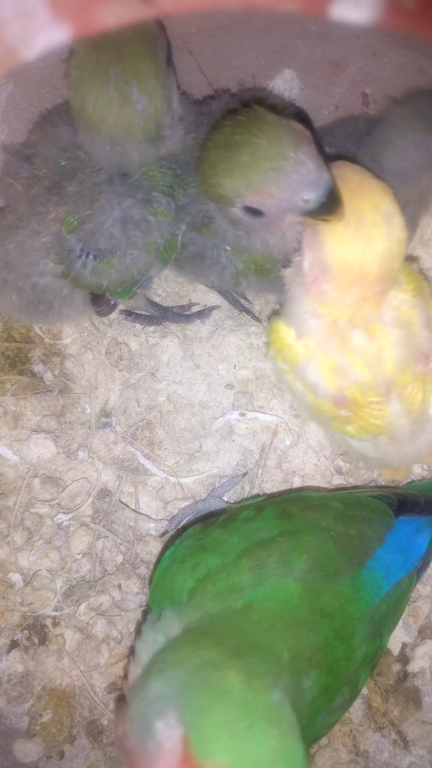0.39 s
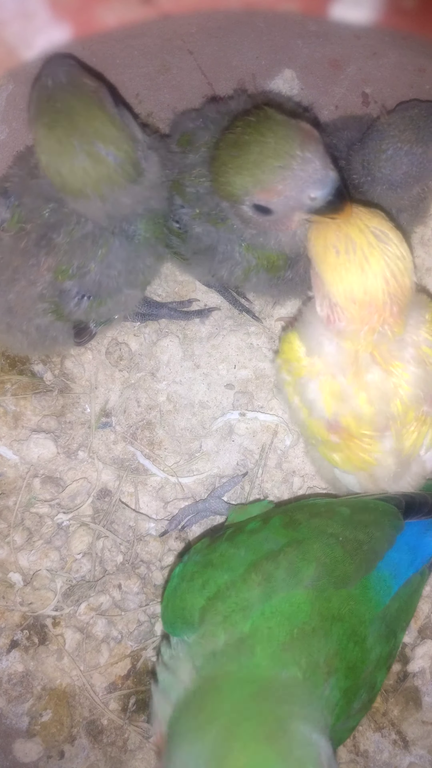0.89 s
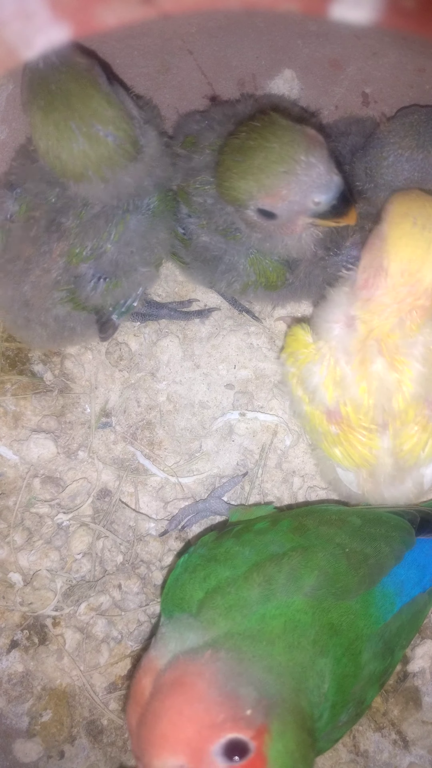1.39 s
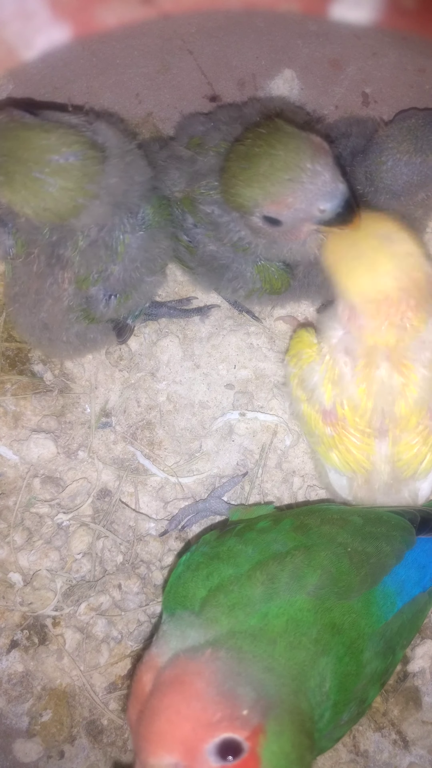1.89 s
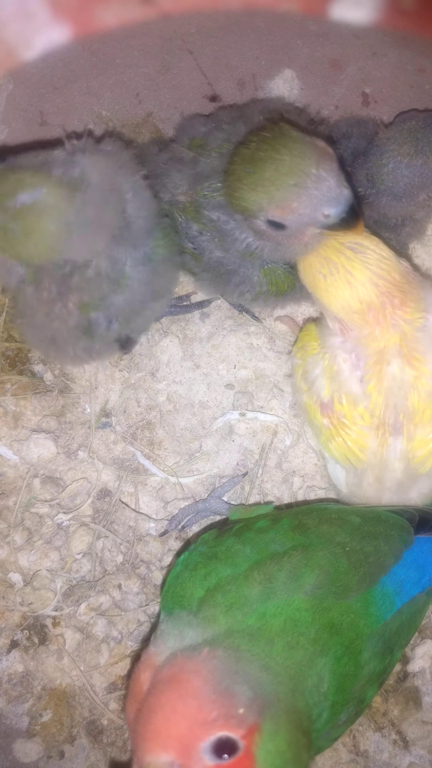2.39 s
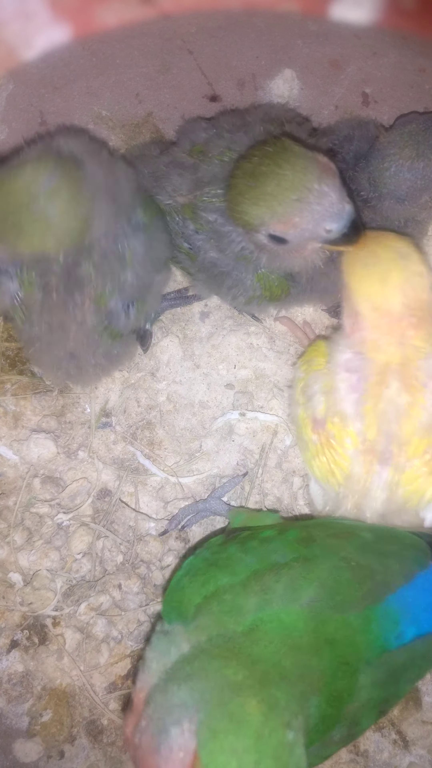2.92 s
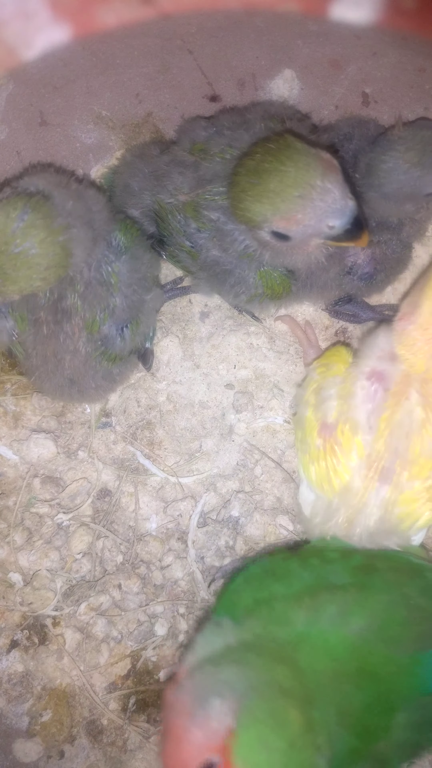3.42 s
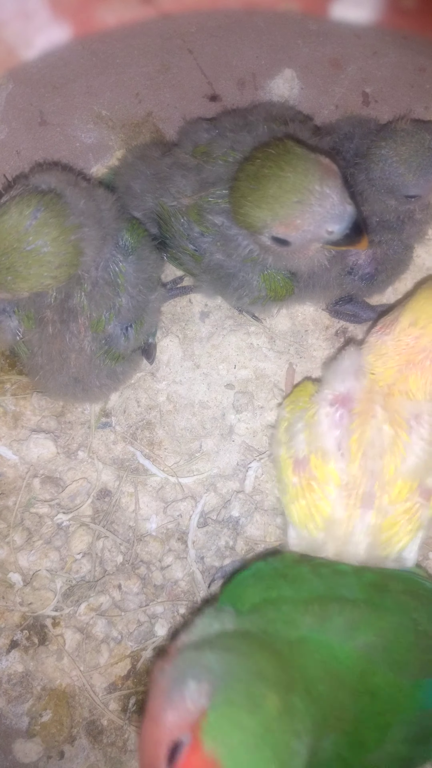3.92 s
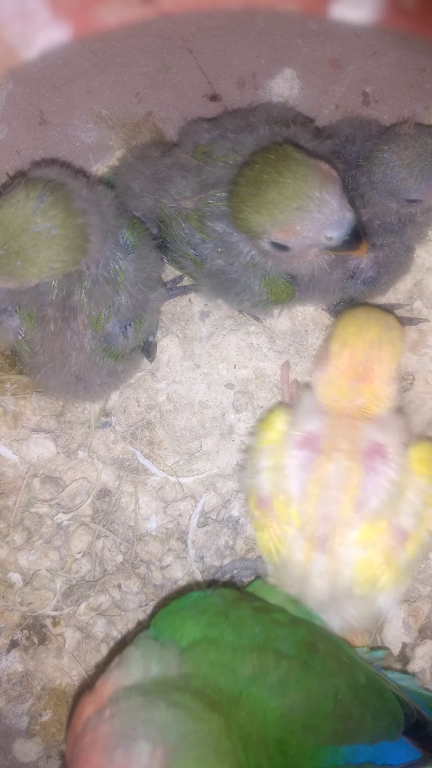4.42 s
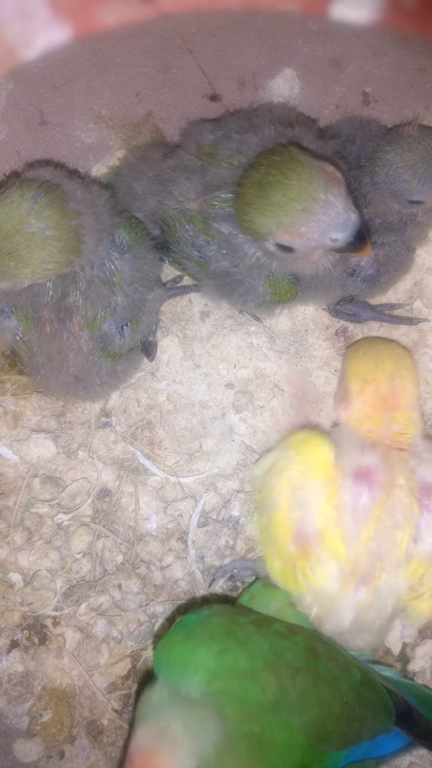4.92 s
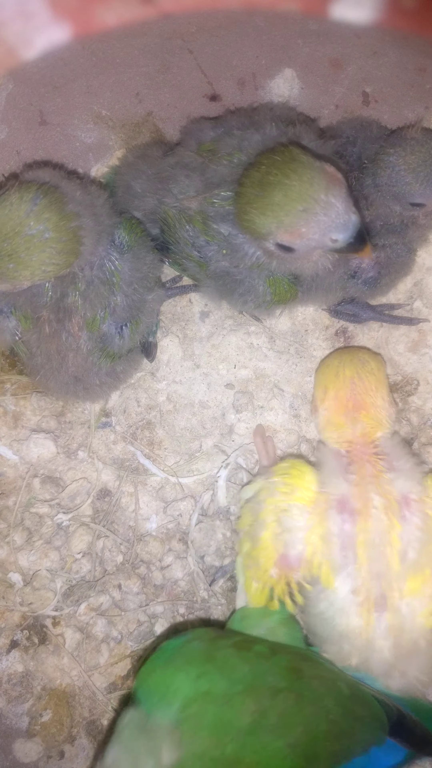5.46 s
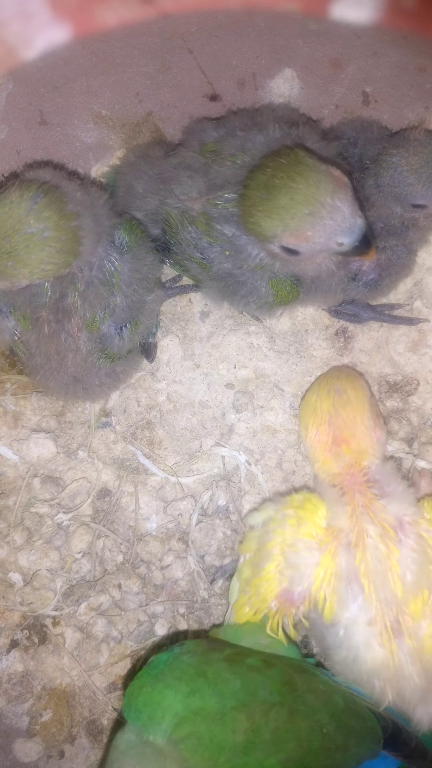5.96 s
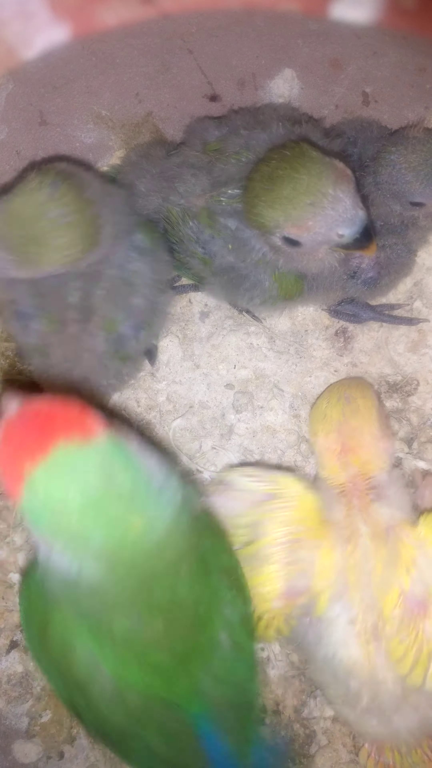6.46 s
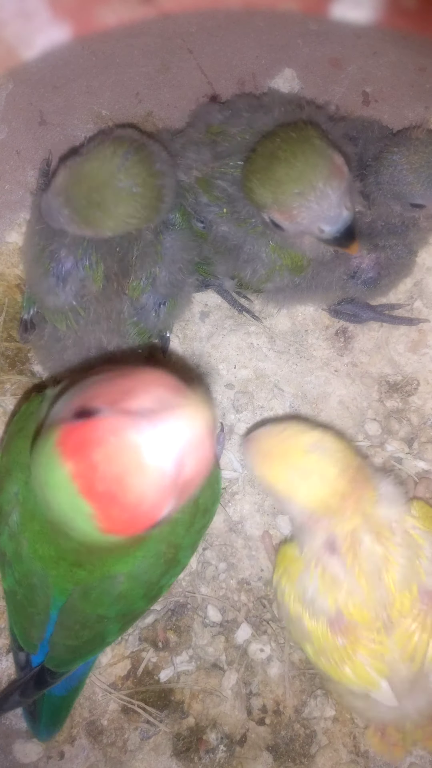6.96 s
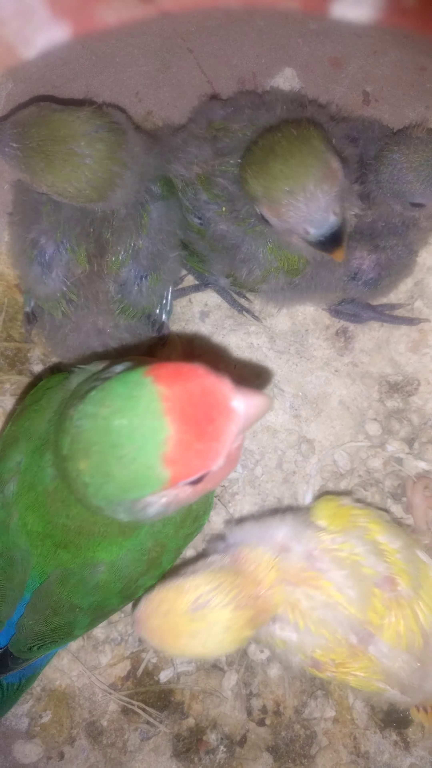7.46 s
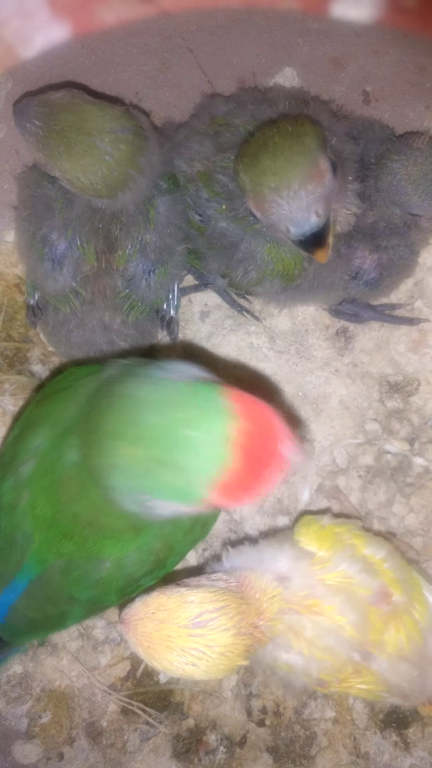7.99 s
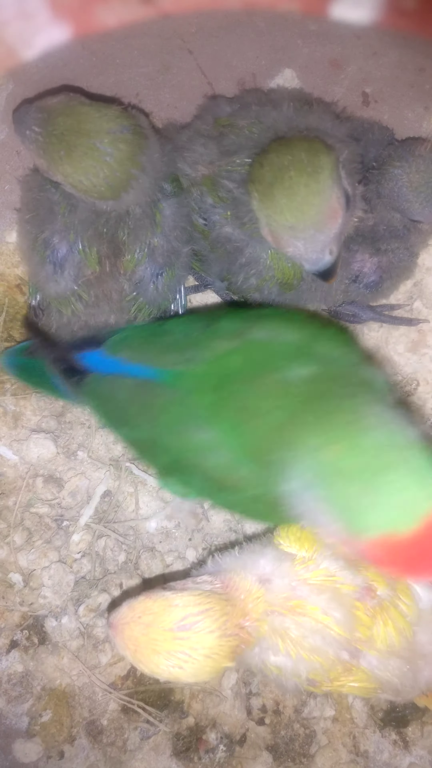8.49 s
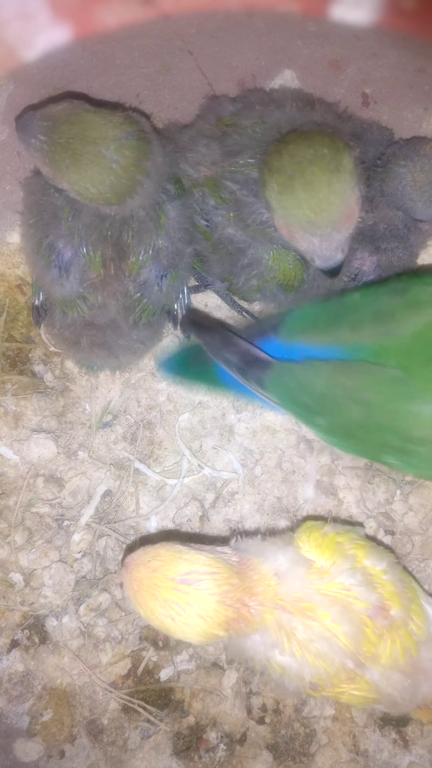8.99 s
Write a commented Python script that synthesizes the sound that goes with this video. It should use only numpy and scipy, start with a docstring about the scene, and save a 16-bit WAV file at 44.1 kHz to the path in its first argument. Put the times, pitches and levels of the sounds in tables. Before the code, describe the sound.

Two sharp squawks, a pause, rapid loud parrot chatter very near, then separate cracking squawks, scratching feet and one faint chick call over low hum.

```python
"""A low hum of the house and one faint far tone, then a squawk close by: small parrots in a nest box.
The near bird squawks, pips and chatters in one long burst; another pips far left, a chick calls near the end.
Each note is a stack of partials from the syrinx; strong breath buffets the two microphone ports and shakes
the pitch. Feet tick and scratch in the litter as filtered noise; box and room ring on as decaying noise tails."""
import sys
import numpy as np
from scipy import signal
from scipy.fft import rfft, irfft, next_fast_len
from scipy.io import wavfile
from scipy.ndimage import uniform_filter1d, minimum_filter1d

SR = 44100
rng = np.random.default_rng(int(sys.argv[2]) if len(sys.argv) > 2 else 0)


def wav_out(sig):
    """Save sig, one row per channel (or a flat mono array), as 16-bit PCM at SR to the path in sys.argv[1]."""
    wavfile.write(sys.argv[1], SR, np.round(np.clip(np.atleast_2d(sig).T, -1, 1) * 32767).astype(np.int16))


def nominal_scale(level):
    """Amplitude ratio for a level in decibels (scalar or array-like)."""
    x = np.asarray(level, float) / 20
    return 10 ** x


N = 402191
T = np.arange(N) / SR

# All levels are those ahead of the limiter in record(); a pan is left minus right.
# Steady house background, relative spectrum: [f/Hz, density/dB]
HOUSE = [(15, -57), (25, -27), (47, -8), (97, 0), (130, -5.5), (170, -2), (195, -6.5), (270, -6),
         (317, -29.5), (545, -24), (1790, -25), (2110, -26), (6050, -41), (16000, -51.5)]
# Slow swell of that background: [t/s, gain/dB]
HUM_SWELL = [(0, 2), (2.8, 0.5), (5.5, 2), (9.12, 2)]
# Dull knock in the house, relative spectrum: [f/Hz, density/dB]
KNOCK = [(300, -30), (600, -2), (900, 0), (1400, -3), (2500, -38)]
# Faint far-off tones: [start t/s, end t/s, first f/Hz, last f/Hz, level/dB]
FAR_TONES = [(0, 0.177, 2820, 2900, -47.5), (.92, 1.082, 489, 484, -52), (1.248, 1.5, 2160, 2136, -60.5),
             (1.681, 1.92, 2070, 2065, -61), (1.867, 2.019, 4280, 5700, -62),
             (1.98, 2.104, 5600, 4420, -62), (2.36, 2.602, 2150, 2100, -61),
             (6.42, 6.704, 1730, 1686, -60.5), (7.451, 7.719, 1780, 1774, -58),
             (8.08, 8.45, 1746, 1705, -58)]
# Feet and beaks in the litter: [t/s, starting level/dB, pan/dB]
TICKS = [(0.9867, -53, -2), (1.3004, -50, -4), (2.39, -44, 2), (4.449, -35, 12), (4.4894, -52, -2),
         (4.9544, -28.5, 24), (5.1729, -33.5, 23), (5.348, -37.5, 16), (5.5415, -31, 3), (5.5987, -38, 12),
         (5.709, -45, 1), (6.307, -40, 19), (6.35, -44, 13), (6.3906, -25, 18), (6.4093, -27, 16),
         (6.4366, -21, 26), (6.6283, -52.5, 4), (6.6988, -40, 15), (6.737, -40.5, 14), (6.772, -41.5, 11),
         (6.8753, -48, 5), (8.8149, -34.5, 24)]
# Bouts of scratching in the litter: [loudest t/s, level/dB, swell/(dB per s), fade/(dB per s)]
BOUTS = [(5.5, -59, 17, 30), (6.375, -36.5, 214, 223), (6.65, -58.5, 10.5, 90), (7.05, -57.5, 130, 89)]
# Sound of disturbed litter, relative spectrum: [f/Hz, density/dB]
LITTER = [(710, -45.5), (1200, -12), (1680, -5.5), (3830, -7.5), (6800, -14), (12900, -8), (16000, -10)]
# One arched begging call of a chick: [t/s, f/Hz, level/dB]
CHICK = [(8.858, 1500, -48), (8.875, 1998, -32), (8.9, 2330, -28), (8.926, 2474, -27), (8.97, 2156, -32),
         (9.018, 1800, -35)]
# Pips of a bird far to the left:
# [start t/s, length t/s, first f/Hz, last f/Hz, level/dB, first over second partial level/dB]
NEIGHBOUR = [(.652, 0.0071, 2676, 2800, -17.5, 7.2), (.681, .017, 2637, 2394, -22.5, 1),
             (.6975, 0.023, 1601, 1570, -21, 6.7)]
# Short pips that open the near bird's chatter:
# [start t/s, length t/s, first f/Hz, last f/Hz, level/dB, first over second partial level/dB]
PIPS = [(2.901, 0.02, 2873, 2957, -13, -31.5), (2.918, .012, 2742, 1707, -11.5, -9.5),
        (2.982, 0.0061, 2619, 2673, -12.5, -29.5), (3.024, .007, 2167, 2845, -13.5, -9.5),
        (3.059, .009, 2117, 2262, -12.5, -29.5), (3.105, 0.0059, 2265, 2242, -12.5, -10),
        (3.127, 0.007, 2255, 2257, -7.5, -28), (3.138, .013, 2241, 3101, -15, -25.5),
        (3.181, .01, 1906, 2295, -15.5, -12), (3.202, .032, 2301, 2653, -14, -28.5)]
# Chatter notes sweeping up from a low onset:
# [start t/s, sweep t/s, first f/Hz, level/dB, upper partials level/dB]
CHATTER = [(3.282, .011, 1738, -14.5, -8), (3.386, .01, 1915, -14.5, -5.5), (3.505, .012, 1764, -15, -5.5),
           (3.613, .012, 1965, -15, -3.5), (3.722, .011, 1723, -14, -9), (3.829, .011, 2086, -14.5, -6.5),
           (3.932, .017, 1946, -14.5, -8.5), (4.064, .017, 1875, -14, -8.5),
           (4.187, .014, 1668, -14, -13.5), (4.3, .017, 1768, -14.5, -8)]
# The whistle each sweep jumps to: [length t/s, first f/Hz, crest f/Hz, last f/Hz, breath level/dB]
WHISTLES = [(.037, 4460, 4940, 4810, -17.5), (.04, 4460, 4890, 4590, -16.5),
            (.041, 4510, 4900, 4490, -17.5), (.041, 4480, 4940, 4770, -19), (.048, 4110, 4900, 5190, -19.5),
            (.044, 4360, 5150, 4960, -16.5), (0.046, 4200, 5200, 5310, -17),
            (.043, 4360, 4500, 5020, -18.5), (.042, 3910, 4890, 5040, -18.5),
            (.043, 4160, 4890, 4850, -21.5)]
# Squawks climb fast, then creep upwards until the voice breaks: [start t/s, time to the break t/s,
# first f/Hz, climb time constant t/s, aim f/Hz, creep/(Hz per s), breath level/dB]
SQUAWKS = [(.162, .055, 2186, .004, 2617, 5977, -23.5), (.293, 0.039, 1688, .004, 2614, 504, -21),
           (5.392, 0.052, 1887, .006, 2638, 509, -16.5), (6.043, .073, 1733, .022, 2654, 3480, -25),
           (7.755, .082, 1894, .012, 2492, 5023, -30.5), (8.526, 0.068, 1927, .004, 2349, 8540, -26),
           (9.025, 0.072, 1846, .006, 2565, 3110, -22)]
# The shriek after each break, carried by the second partial:
# [length t/s, first f/Hz, last f/Hz, level/dB, breath level/dB]
SHRIEKS = [(.023, 3520, 3440, -12, -21), (0.023, 3480, 3370, -13, -21), (.025, 3450, 3300, -17, -21),
           (.028, 3500, 2850, -9.5, -15), (.034, 3450, 2730, -10, -14.5), (.04, 3087, 2780, -13.5, -21.5),
           (.019, 3510, 3190, -7.5, -12)]
# The near bird turns its head: [t/s, pan/dB]
HEAD = [(.16, -4), (.3, -3), (2.9, 1), (3.06, 4), (3.2, -1), (3.5, 0), (3.9, -0.5), (4.3, 0), (5.4, 0.5),
        (6.05, 2), (7.76, -0.5), (8.53, 1), (9.03, 5.5)]
# Timbre of each caller: [upper partials level/dB, rasp level/dB, room level/dB, pitch wobble/share]
SQUAWK_TONE = (-5, -14.5, -13, .008)
PIP_TONE = (-8, -10.5, -15.5, .012)
NEIGHBOUR_TONE = (-7, -15, -28, .006)
CHICK_TONE = (-31, -11, -11, .02)
# Chatter timbre; upper partials are set note by note: [rasp level/dB, room level/dB, pitch wobble/share]
CHATTER_TONE = (-13, -9.5, .012)
# Shaping of the upper partials by the beak: [f/Hz, gain/dB]
BEAK = [(1500, -1), (5000, 8), (7000, 5), (8600, -2.5), (10500, 1.5), (13500, -0.5), (16000, -7.5)]
# Hoarse air in the voice, relative spectrum: [f/Hz, density/dB]
HOARSE = [(700, -29), (2000, -11), (3300, -5.5), (5500, -1.5), (6900, -15), (8200, -10.5), (11000, 6),
          (14000, 1.5), (16000, -20.5)]
# Breath blowing on the microphone, relative spectrum: [f/Hz, density/dB]
BUFFET = [(25, -21), (60, 1), (250, -3.5), (600, -13.5), (1200, -19.5), (3000, -40)]

HOUSE_DB = -44  # rms of each part of the background, before its swell
KNOCK_S, KNOCK_DB, KNOCK_T60_S = 2.122, -41.5, 0.1
LEFT_LAG = 9  # samples
TOP_HZ = 15900  # no partial is sounded above this, and the finished sound is cut here
NEIGHBOUR_PAN_DB, CHICK_PAN_DB = 23, -7.5
TRILL_PER_S, TRILL_SHARE = 72, .045  # quaver of the chick's pitch
NO_BREATH_DB = -70  # the other birds are too far to blow on the microphone
ONSET_S, CALM_DB = 0.0043, -44.5  # length of a note's onset; breath before the effort builds
EVEN_HZ, HZ_PER_DB = 2730, 75  # squawk pitch of equal lowest partials; below it the first is weaker
FLUTTER_DB, FLUTTER_PER_S, WOBBLE_PER_S = 1.5, 250, 190  # unsteady loudness and pitch in every call
SNAP_DB, SNAP_S = 9.5, 0.0058  # hoarse air added as the syrinx snaps open, and its time constant


def colour(x, points):
    """Shape by [f/Hz, level/dB] points, then bring to rms 1."""
    hz, db = np.transpose(points)
    size = next_fast_len(N, True)
    f = np.maximum(np.arange(size // 2 + 1) * SR / size, 1)
    gain = nominal_scale(np.interp(np.log(f), np.log(hz), db))
    y = irfft(rfft(x, size) * gain, size)[:N]
    return y / np.std(y)


def noise():
    """White noise."""
    return rng.standard_normal(N)


def walk(rate):
    """Random levels held 1 / rate s and slewed twice; spread 1."""
    k = int(SR / rate)
    held = np.repeat(rng.standard_normal(N // k + 1), k)
    y = uniform_filter1d(uniform_filter1d(held, k), k)[:N]
    return y / np.std(y)


def place(x, pan_db):
    """Equal-power pan; the left port is further along the path of the sound and hears it later."""
    right = np.sqrt(2 / (1 + nominal_scale(2 * pan_db)))
    return np.array([np.roll(x * right * nominal_scale(pan_db), LEFT_LAG), x * right])


def ring(x, t60, db):
    """A diffuse tail of decaying noise, different at each port."""
    t = np.arange(SR // 2) / SR
    tail = rng.standard_normal((2, len(t))) * nominal_scale(-60 * t / t60)
    tail = tail / np.sqrt(np.sum(tail ** 2, axis=1, keepdims=True))
    return nominal_scale(db) * signal.fftconvolve(x, tail, axes=1)[:, :N]


def house():
    """Steady shaped noise that swells slowly; its low hum reaches both ports alike."""
    mid, side = colour(noise(), HOUSE), colour(noise(), HOUSE)
    side = signal.sosfilt(signal.butter(2, 330., "high", fs=SR, output="sos"), side)
    s, db = np.transpose(HUM_SWELL)
    swell = nominal_scale(HOUSE_DB + np.interp(T, s, db) + 0.32 * walk(4.2))
    return swell * np.array([mid + side, mid - side])


def far_tones():
    """Wavering whistles and hums from afar, heard only as their diffuse echo."""
    out, waver = np.zeros(N), walk(60)
    for start, end, first_hz, last_hz, db in FAR_TONES:
        i = np.arange(int(start * SR), int(end * SR))
        hz = np.linspace(first_hz, last_hz, len(i)) * (1 + 0.014 * waver[i])
        tone = np.sin(2 * np.pi * np.cumsum(hz) / SR)
        out[i] += nominal_scale(db) * np.hanning(len(i)) ** .5 * tone
    return ring(np.array([out, out]), 0.1, 6.2)


def knock():
    """A short dull thud far off: shaped noise that dies away exponentially, alike at both ports."""
    since = np.maximum(T - KNOCK_S, 0)
    decay = nominal_scale(KNOCK_DB - 60 * np.minimum(since, 1) / KNOCK_T60_S)
    return (T > KNOCK_S) * decay * colour(noise(), KNOCK)


def litter():
    """Decaying noise ticks and a dense crackle of husks under moving feet, with a short tail."""
    s, db, pan_db = np.transpose(TICKS)
    blows = np.zeros(N)
    blows[(s * SR).astype(int)] = nominal_scale(db)
    decay_s = 0.0032
    ticks = signal.lfilter([1], [1, -np.exp(-1 / (decay_s * SR))], blows)
    scratch = 0
    for at, top_db, up, down in BOUTS:
        scratch = scratch + nominal_scale(top_db - np.where(T < at, up * (at - T), down * (T - at)))
    # rare strong samples in the noise make the husks crackle
    crackle = nominal_scale(3.5 * rng.exponential(size=N) + 2.2 * walk(150))
    husks = colour(noise() * crackle, LITTER)
    near = place(ticks * colour(noise(), LITTER), np.interp(T, s, pan_db))
    near = near + place(scratch * husks, 14.0)
    return near + ring(near, 0.083, -5.5)


# Each call below is a list of rows:
# [t/s, f/Hz, level/dB, first over second partial level/dB, breath level/dB]
def chick():
    """One arched begging call; a fast sine makes its pitch quaver."""
    s, hz, db = np.transpose(CHICK)
    t = np.linspace(s[0], s[-1], num=160)
    quaver = 1 + TRILL_SHARE * np.sin(2 * np.pi * TRILL_PER_S * t)
    curve = zip(t, np.interp(t, s, hz) * quaver, np.interp(t, s, db))
    return [(*row, 15.5, NO_BREATH_DB) for row in curve]


def pip(start, length, first_hz, last_hz, db, first_db, calm_db, fade_s=0.0049, fade_db=-12):
    """One glide; the harder the bird blows, the weaker the first partial."""
    breath_db = calm_db - .62 * min(first_db, 0)
    turn = max(length - fade_s, .002)
    turn_hz = first_hz + (last_hz - first_hz) * turn / length
    return [(start, first_hz, db - .8, first_db, breath_db),
            (start + turn, turn_hz, db, first_db, breath_db),
            (start + length, last_hz, db + fade_db, first_db, breath_db)]


def chatter(sweep, whistle, knee_hz=3300, crest_s=0.02):
    """Low onset, fast sweep, jump to a near-pure whistle; effort crests midway through it, then eases
    while the pitch sags or rises on."""
    start, length, first_hz, db, _ = sweep
    tail, land_hz, crest_hz, last_hz, breath_db = whistle
    jump = start + length
    return [(start, first_hz, db - .8, -11, CALM_DB),
            (start + ONSET_S, 1.03 * first_hz, db, -17, CALM_DB),
            (jump - .004, .82 * knee_hz, db, -7, -41),
            (jump - .001, knee_hz, db - 2.0, 17, -33),
            (jump, land_hz, db, 13, breath_db - 9),
            (jump + crest_s, crest_hz, db - 0.5, 14, breath_db),
            (jump + tail - .004, last_hz, db - 3.5, 17, -37),
            (jump + tail, last_hz, db - 7, 17, -40)]


def squawk(call, shriek, level_db=-14, sag_db=-2.5):
    """The pitch climbs as effort builds, then the voice breaks with a burst of air into a shriek."""
    start, length, first_hz, climb, aim_hz, creep, breath_db = call
    tail, high_hz, last_hz, shriek_db, burst_db = shriek
    crack, share = start + length, np.linspace(0, 1, num=14)
    s = share * (length - ONSET_S)
    hz = aim_hz + (first_hz - aim_hz) * np.exp(-s / climb) + creep * s
    rise = zip(start + ONSET_S + s, hz, level_db + sag_db * share,
               (hz - EVEN_HZ) / HZ_PER_DB, breath_db - 8 * (1 - share))
    return [(start, 1.04 * first_hz, level_db + 1.0, (first_hz - EVEN_HZ) / HZ_PER_DB, CALM_DB),
            *rise,
            (crack + 0.0022, high_hz, shriek_db, -17, burst_db),
            (crack + .008, .6 * high_hz + .4 * last_hz, shriek_db, -30, burst_db - 1.5),
            (crack + tail - .004, last_hz, shriek_db - .5, -32, burst_db - 6),
            (crack + tail, last_hz, shriek_db - 9, -28, burst_db - 11.5)]


def calls():
    """Every call as (rows, pan/dB, timbre), in order of time."""
    near = [(squawk(*pair), SQUAWK_TONE) for pair in zip(SQUAWKS, SHRIEKS)]
    for sweep, whistle in zip(CHATTER, WHISTLES):
        near.append((chatter(sweep, whistle), (sweep[-1], *CHATTER_TONE)))
    near += [(pip(*row, CALM_DB + 2), PIP_TONE) for row in PIPS]
    out = [(rows, np.interp(rows[0][0], *np.transpose(HEAD)), tone) for rows, tone in near]
    out += [(pip(*row, NO_BREATH_DB), NEIGHBOUR_PAN_DB, NEIGHBOUR_TONE) for row in NEIGHBOUR]
    out += [(chick(), CHICK_PAN_DB, CHICK_TONE)]
    return sorted(out, key=lambda call: call[0][0][0])


def controls(attack_s, release_s, still_db):
    """The calls as curves; each holds its last values until the next begins; silence between calls."""
    curves, gate = np.zeros((9, N)), np.zeros(N)
    order = calls()
    cues = [0] + [int((rows[0][0] - attack_s) * SR) for rows, _, _ in order[1:]] + [N]
    for (rows, pan_db, tone), a, b in zip(order, cues, cues[1:]):
        s, *columns = np.array(sorted(rows)).T
        curves[:4, a:b] = [np.interp(T[a:b], s, c) for c in columns]
        curves[4:, a:b] = np.array([pan_db, *tone])[:, None]
        corners = [s[0] - attack_s, s[0], s[-1], s[-1] + release_s]
        gate[a:b] = np.interp(T[a:b], corners, [0, 1, 1, 0]) ** 2
    hz, db, first_db, breath_db = curves[:4]
    # only breath stronger than the still air of the box is felt; it comes in gusts and lingers a little
    felt = np.sqrt(np.maximum(nominal_scale(breath_db) ** 2 - nominal_scale(still_db) ** 2, 0))
    gusts = felt * nominal_scale(2.2 * walk(120))
    breath = gusts * np.minimum(1.03 * uniform_filter1d(gate, size=900), 1)
    hz = hz * (1 + curves[-1] * walk(WOBBLE_PER_S))
    level = gate * nominal_scale(db + FLUTTER_DB * walk(FLUTTER_PER_S))
    return hz, level, first_db, breath, curves[4:-1]


def snap():
    """Gain of the hoarse air: high at the start of each call of the near bird, soon back to 1."""
    kicks = np.zeros(N)
    kicks[[int(row[0] * SR) for row in SQUAWKS + CHATTER + PIPS]] = nominal_scale(SNAP_DB)
    return 1 + signal.lfilter([1], [1, -np.exp(-1 / (SNAP_S * SR))], kicks)


def syrinx(hz, first_db, upper_db, breath, shake, jitter):
    """Nine partials on one phase, summed to an even power; strong airflow makes the pitch shake."""
    unsteady = shake * np.minimum(breath, .1) * walk(700) + jitter * walk(2500)
    hz = uniform_filter1d(hz, size=60) * (1 + unsteady)
    phase = 2 * np.pi * np.cumsum(hz) / SR
    beak_hz, beak_db = np.transpose(BEAK)
    voice, power = 0, 0
    for k in range(1, 10):
        if k < 3:
            # a positive balance weakens the second partial, a negative one the first
            db = np.minimum(0, first_db * (3 - 2 * k))
        else:
            # a weak first partial means weak odd ones; a strong one means a purer tone
            weakened = (k % 2) | (first_db > 0)
            db = upper_db + np.interp(k * hz, beak_hz, beak_db) - 0.52 * np.abs(first_db) * weakened
        gain = nominal_scale(db) * (k * hz < TOP_HZ)
        voice = voice + gain * np.sin(k * phase)
        power = power + gain ** 2 / 2
    return voice / np.sqrt(power)


def birds():
    """Voices, their rasp, hoarse air and breath buffeting; box walls and room ring on."""
    hz, level, first_db, breath, tone = controls(attack_s=.0005, release_s=0.0014, still_db=-38.5)
    pan_db, upper_db, rasp_db, room_db = tone
    voice = level * syrinx(hz, first_db, upper_db, breath, shake=0.27, jitter=0.076 * nominal_scale(rasp_db))
    # uneven cycles spread sidebands round every partial, more so under strong airflow
    voice = voice * (1 + 1.39 * nominal_scale(rasp_db) * (1 + 2.8 * breath) * walk(2200))
    air_level = level * snap() * nominal_scale(upper_db - 10.0)
    hoarse = np.array([air_level * colour(noise(), HOARSE) for port in range(2)])
    near = place(voice, pan_db) + hoarse
    # the ports feel partly the same breath, the left one more strongly
    shared = noise()
    buffet = [breath * nominal_scale(db) * colour(shared + 1.4 * noise(), BUFFET) for db in (2.5, -4.)]
    box = ring(near, .014, -1.0)
    room = ring((near + nominal_scale(-0.5) * hoarse) * nominal_scale(room_db), 0.27, 0)
    return near + box + room + np.array(buffet)


def scene():
    """House, knock, far tones, litter and birds at the two ports."""
    return birds() + litter() + far_tones() + knock() + house()


def roll_off(x):
    """The treble ends steeply here."""
    return signal.sosfilt(signal.butter(12, 17050, fs=SR, output="sos"), x)


def record(dry):
    """A quick limiter at each port partly flattens the loud calls; the top is cut."""
    peak = uniform_filter1d(-minimum_filter1d(-np.abs(dry), size=130), size=130)
    limited = dry * np.minimum(1, nominal_scale(-5.5) / peak) ** 0.55
    mix = signal.sosfilt(signal.ellip(8, .2, 60, TOP_HZ, fs=SR, output="sos"), limited)
    return roll_off(mix)


dry = scene()
out = record(dry)
wav_out(out)
```